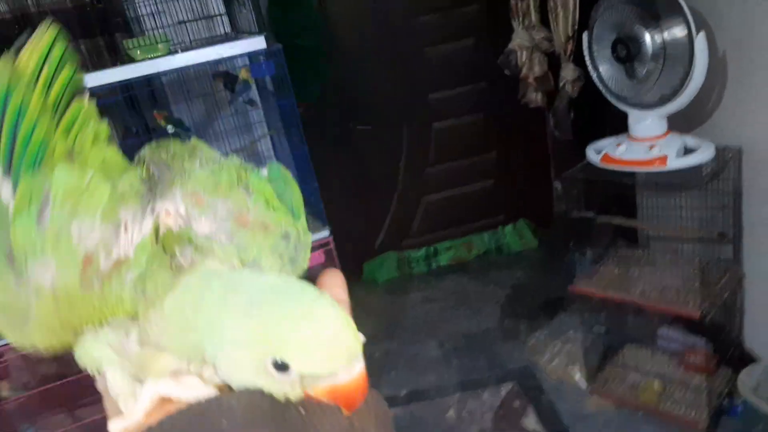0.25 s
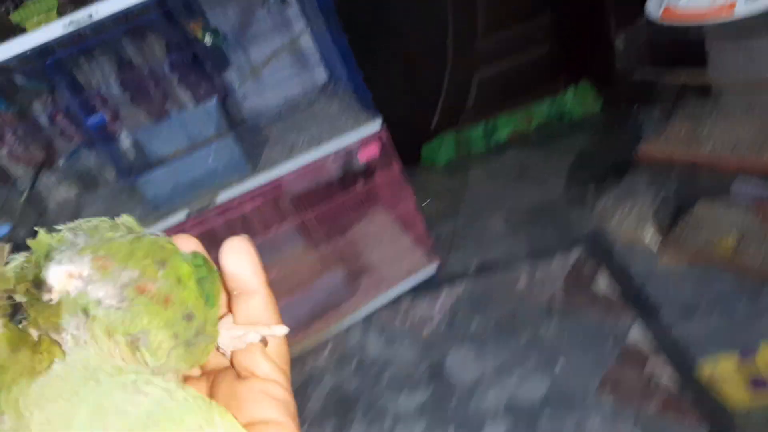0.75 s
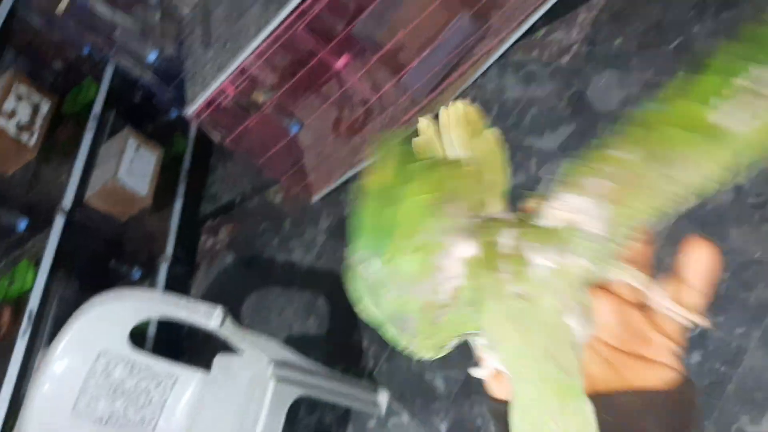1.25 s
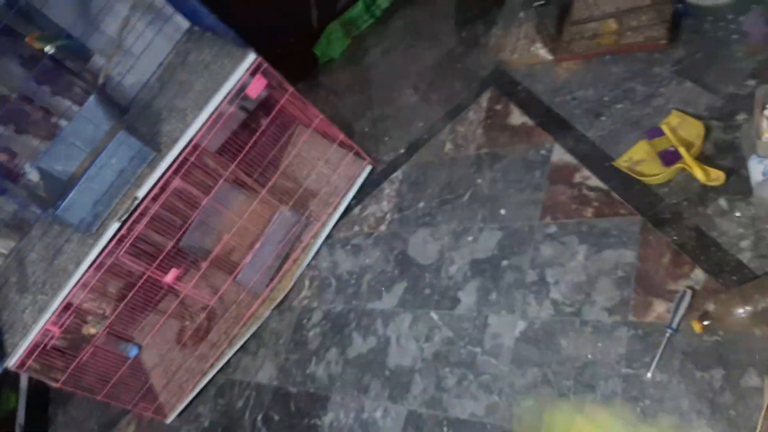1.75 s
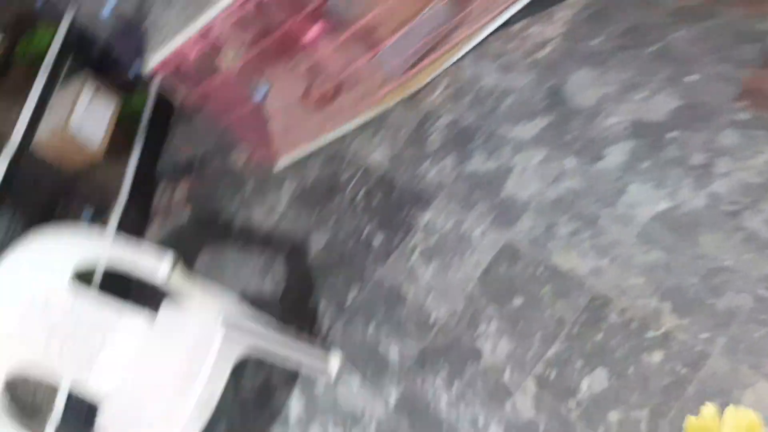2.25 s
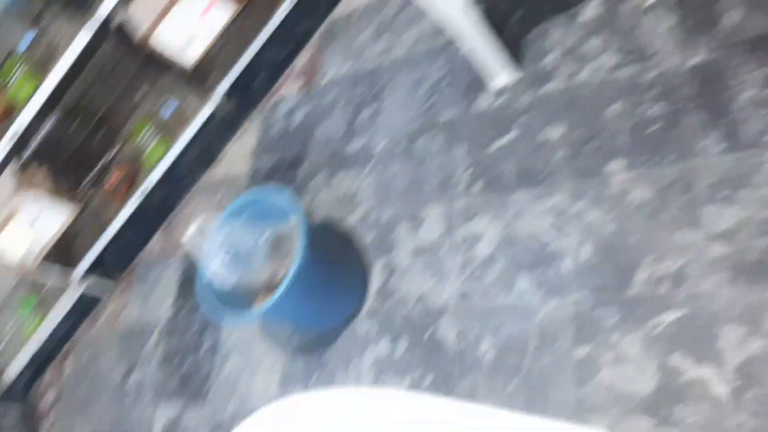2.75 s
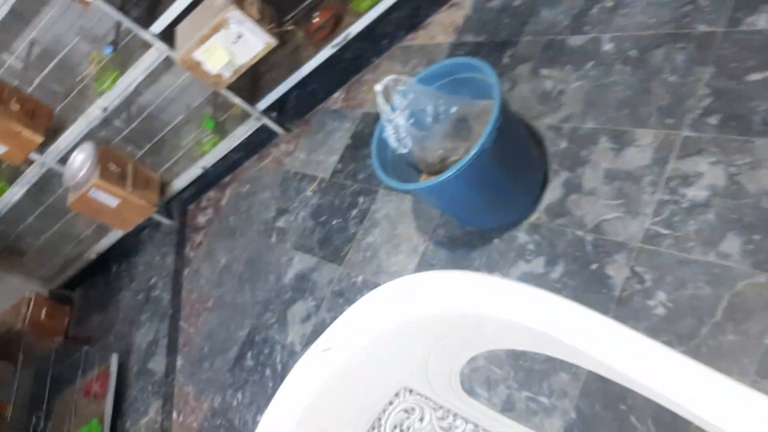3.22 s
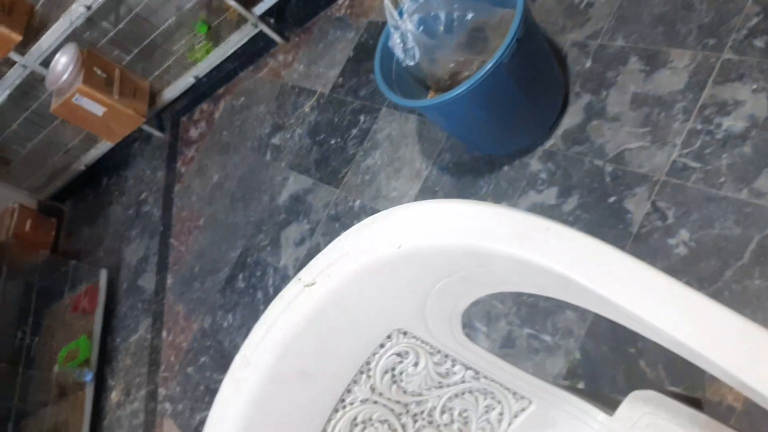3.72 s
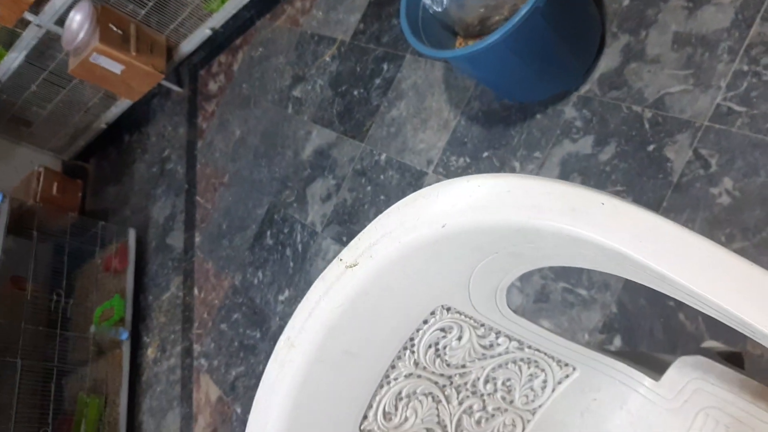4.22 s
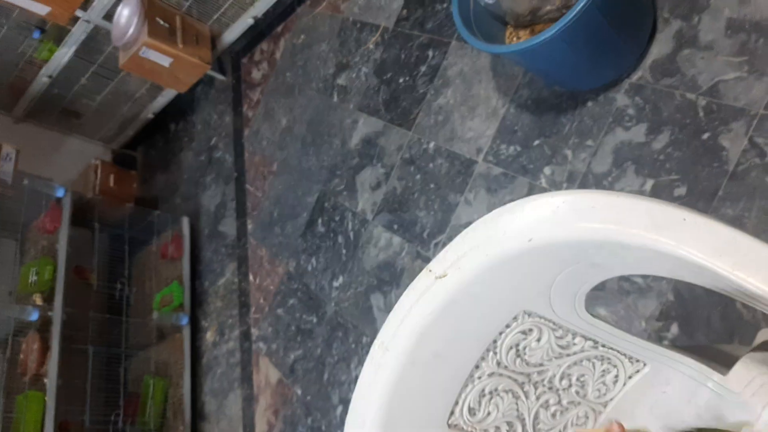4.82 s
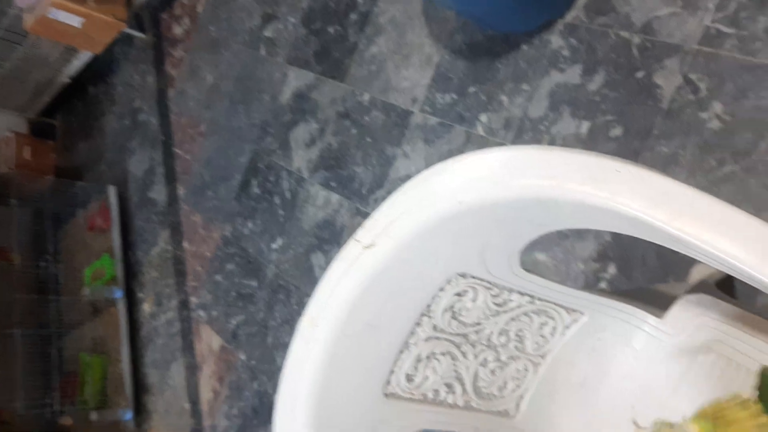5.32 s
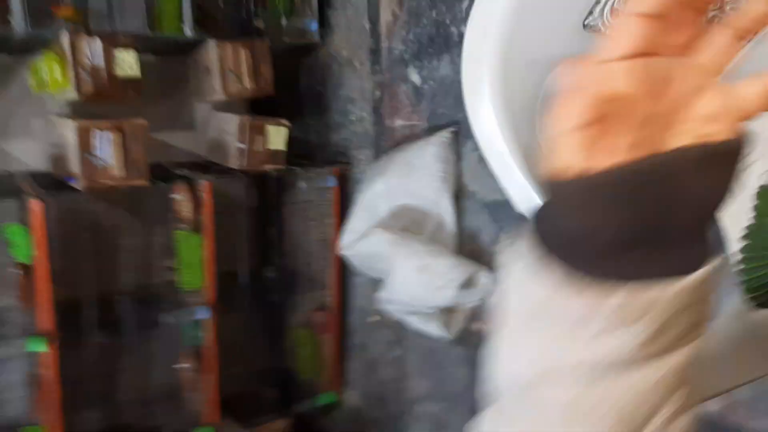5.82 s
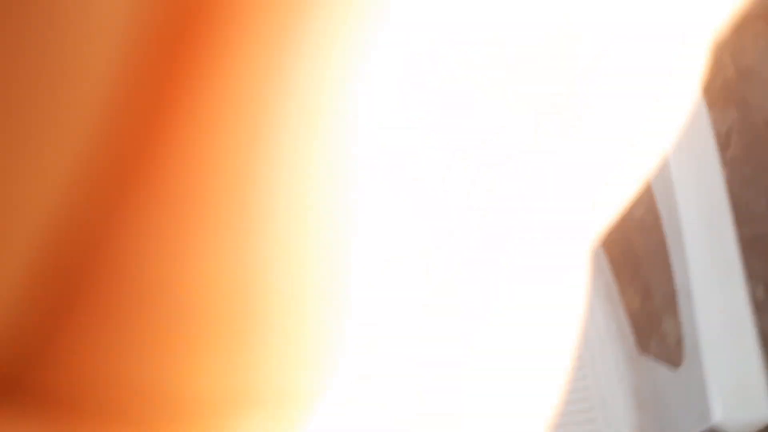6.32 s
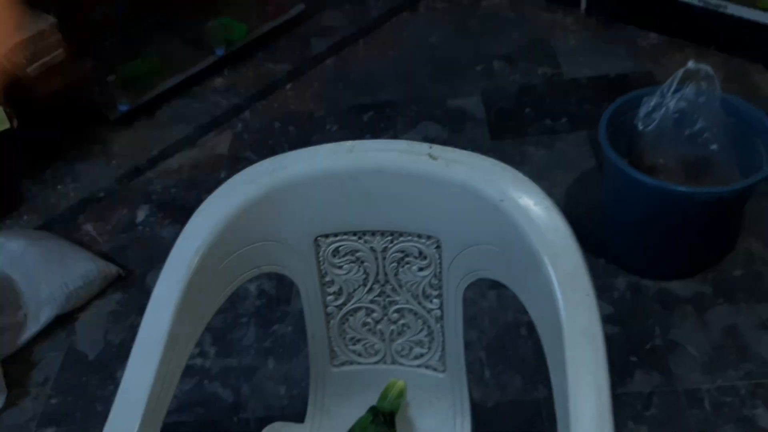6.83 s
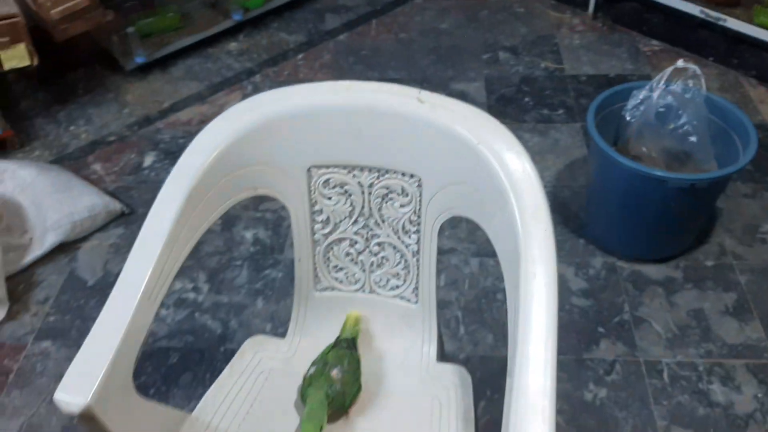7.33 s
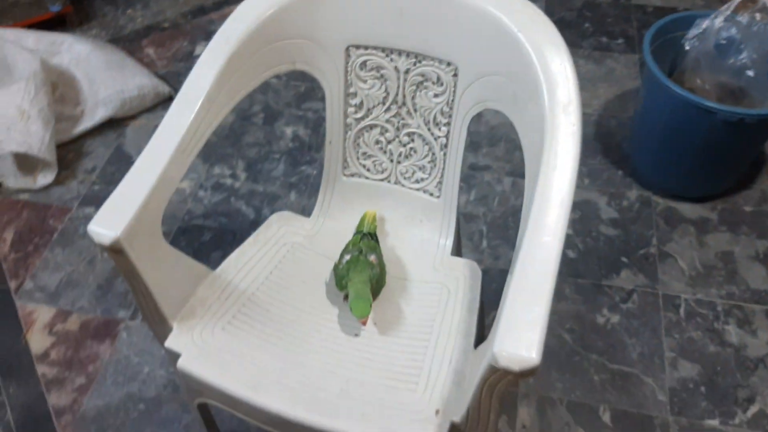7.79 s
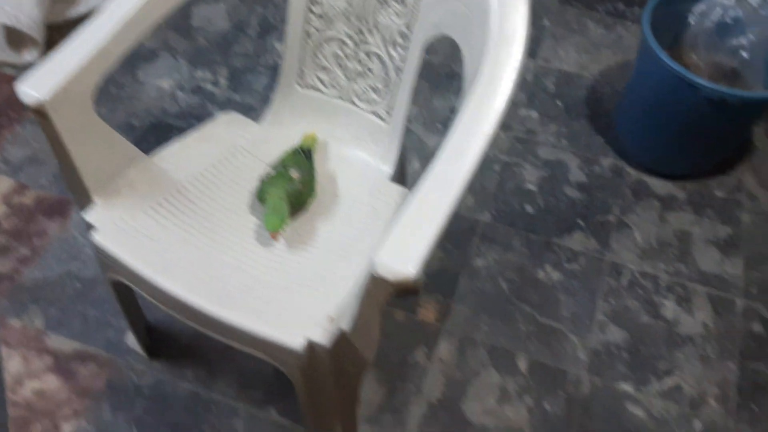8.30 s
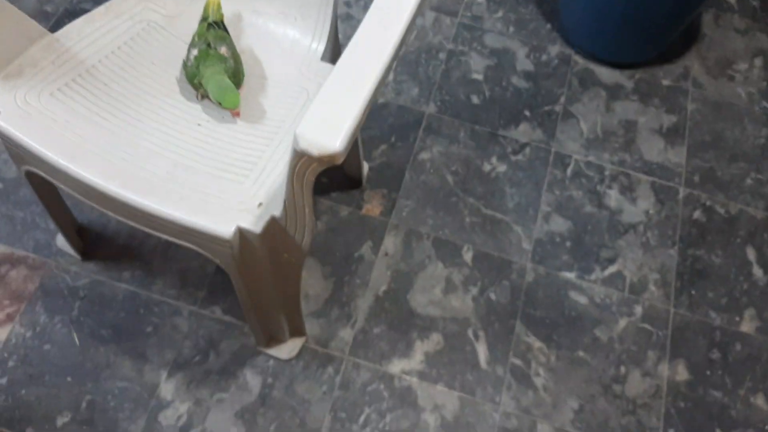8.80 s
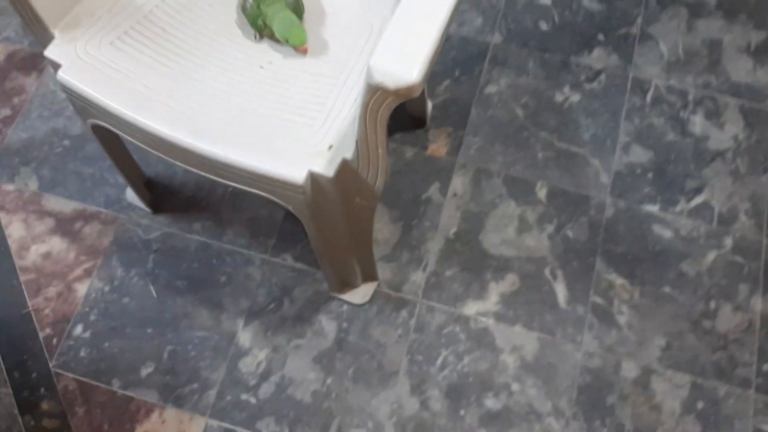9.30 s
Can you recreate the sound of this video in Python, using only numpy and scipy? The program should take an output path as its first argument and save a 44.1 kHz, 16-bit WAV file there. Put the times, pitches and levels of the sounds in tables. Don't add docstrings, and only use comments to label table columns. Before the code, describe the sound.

A chick beside a handheld microphone gives a short squawk and a longer raspy warble. Beak ticks follow, then sharp rising chirps from caged birds. Later, nasal chatter and harsh cries crowd together while feet tap a hollow plastic chair. The calls smear into short bright echoes in a hard-floored shed, over faint hum and moving air, ending with dull finger bumps.

```python
import sys
import numpy as np
from scipy import signal
from scipy.io import wavfile
from scipy.ndimage import uniform_filter1d, minimum_filter1d

SR = 44100
rng = np.random.default_rng(int(sys.argv[2]) if len(sys.argv) > 2 else 0)


def convert_level_to_amplitude(level_db):
    exponent = np.asarray(level_db, float) / 20
    return 10 ** exponent


def dump(signal):
    limited = np.clip(np.atleast_2d(signal).T, -1, 1)
    pcm = np.round(limited * 32767).astype(np.int16)
    wavfile.write(sys.argv[1], SR, pcm)


N = 421155
PORT_GAP = 7
TURN_S = 3.42

# f/Hz, level/dB
CAGED_THROAT = [(1900, -58), (2200, 1.5), (3500, 20.5), (5000, 11), (6500, 0.5), (7500, -11.5), (9000, -17),
                (12500, -19), (15500, -23.5)]


def evened(x):
    return x / np.sqrt(np.mean(x ** 2) + 1e-20)


def read(points, hz):
    f, value = np.transpose(points)[:2]
    return np.interp(np.log(hz + 1), np.log(f + 1), value)


def add(mix, s, sound):
    part = mix[..., round(s * SR):][..., :sound.shape[-1]]
    part += sound[..., :part.shape[-1]]


def unfold(rows):
    s, *columns = np.transpose(rows)
    t = np.arange(s[0], s[-1], 1 / SR)
    return t, [np.interp(t, s, c) for c in columns]


def wobble(count, hz):
    drift = signal.lfilter(*signal.butter(2, hz, fs=SR), rng.standard_normal(count + 400))
    return evened(drift[400:])


def highpass(x, order, hz):
    return signal.sosfilt(signal.butter(order, hz, "high", fs=SR, output="sos"), x)


def coloured(x, points):
    hz = np.linspace(0, SR / 2, 257)
    return signal.oaconvolve(x, signal.firwin2(255, hz, convert_level_to_amplitude(read(points, hz)), fs=SR), "same")


def syrinx(hz, first_db, harsh, throat, jitter, breath_db):
    count = len(hz)
    shaken_hz = hz * (1 + jitter * harsh * wobble(count, hz=461))
    turn = 2 * np.pi * np.cumsum(shaken_hz) / SR
    partials = np.zeros(count)
    for k in range(1, 9):
        level_db = read(throat, k * hz) + first_db * (k == 1)
        partials += convert_level_to_amplitude(level_db) * (k * hz < 16000) * np.cos(k * turn)
    air = evened(coloured(rng.standard_normal(count), throat))
    pulsing = convert_level_to_amplitude(8 * harsh * wobble(count, hz=190).clip(-3, 1.3))
    return evened((evened(partials) + convert_level_to_amplitude(breath_db) * harsh * air) * pulsing)


def chick():
    # t/s, level/dB, lowest pitch f/Hz, warble height f/Hz, extra level on crests/dB
    squawks = [
        [(0, -13.5, 1290, 86, -5.5), (.06, -0.5, 1232, 30, 2), (.09, -10, 1134, 3, 3), (.102, -38, 960, 5, 0)],
        [(.3, -21.5, 1453, 5.4, -8), (.318, -22.5, 1253, 6, -3), (.33, -14, 1613, 340, -2),
         (.38, -8.5, 1562, 540, 7), (.45, -7, 1473, 530, 17.5), (.55, -10.5, 1370, 270, -1),
         (.62, -10.5, 1288, 42, -6.5), (.662, -2, 1157, 10, -2), (.676, -27, 960, 5, 10)],
    ]
    crest_times = [0.0165, .3425]
    # f/Hz, level/dB
    narrow_throat = [(1100, -14), (1500, -0.5), (2000, 6.5), (2500, 9.5), (3000, 10), (4000, 4.5),
                     (5000, -9), (6000, -12), (7000, -22.5), (9000, -27.5), (14000, -28)]
    # f/Hz, level/dB
    open_throat = [(1100, -9), (1500, -4), (2000, 5), (2600, 3), (3900, 7), (4800, -4), (6000, -2),
                   (7300, -20), (14000, -52)]
    warble_hz, rasp_db, crack_db = 28.6, -9, 9
    out = np.zeros(N)
    for rows, crest_s, harsh, throat in zip(squawks, crest_times, (.25, .12), (narrow_throat, open_throat)):
        t, (level_db, low_hz, height_hz, crest_db) = unfold(rows)
        arch = .5 + .55 * np.tanh(.25 + 1.25 * np.cos(2 * np.pi * warble_hz * (t - crest_s)))
        top_db = crest_db * (2 * arch - 1)
        swing = height_hz / 500 * (1 - arch.clip(0, 1) ** 2)
        first_db = crack_db * swing - .31 * top_db
        voice = syrinx(low_hz + height_hz * arch, first_db, harsh + .08 * swing, throat, .07, -41)
        voice *= convert_level_to_amplitude(-crack_db * swing)
        rasp = evened(highpass(coloured(rng.standard_normal(len(t)), narrow_throat), 6, 3300))
        add(out, t[0], convert_level_to_amplitude(level_db) * (convert_level_to_amplitude(top_db) * voice + convert_level_to_amplitude(rasp_db) * rasp))
    return highpass(out, 6, 900)


def perch(mix, s, sound):
    lag_s = rng.integers(5, PORT_GAP + 2) / SR
    add(mix[int(s > TURN_S)], s, sound)
    add(mix[int(s < TURN_S)], s + lag_s, sound)


def chirps(mix):
    # t/s, peak level/dB, second partial at start f/Hz, at end f/Hz, length/s
    jumps = [
        (1.072, -1.5, 4150, 6170, 0.048),
        (5.026, -3.5, 4700, 6000, 0.054),
        (5.331, -0.5, 4710, 5910, 0.048),
        (5.641, -1, 4650, 5850, 0.054),
        (7.886, -4, 4250, 5726, 0.0585),
        (8.528, -5, 4346, 5925, 0.054),
    ]
    quick = [(1.599, -1, 4140, 6240, 0.041), (1.904, 1.5, 4466, 6200, 0.035),
             (2.066, -3, 4390, 6710, 0.032), (2.155, 0.5, 4693, 6890, 0.032), (2.262, 2, 4660, 6570, 0.028),
             (2.363, -2, 4710, 6530, 0.031), (2.459, 0, 4950, 6300, 0.036), (2.68, -4.5, 4100, 6030, 0.053),
             (3.289, -13, 4080, 6170, 0.038), (3.677, -0.5, 4435, 6070, 0.041),
             (3.902, -3.5, 4450, 6275, 0.059), (4.023, -5.5, 4210, 6160, 0.042),
             (4.146, -2.5, 4590, 6330, 0.047), (7.652, -6, 4200, 5000, 0.053),
             (8.736, -8.5, 4216, 6320, 0.04)]
    sweeps = [
        (3.474, -5, 4133, 6070, 0.07),
        (4.695, -5, 4080, 6180, 0.053),
        (9.149, -3.5, 4477, 6370, 0.058),
    ]
    # f/Hz, level/dB
    throat = [(1900, -6.5), (2200, 3.5), (3500, 6.5), (5000, 11.5), (6400, 6), (7500, -18), (9000, -22.5),
              (11000, -15.5), (13000, -19), (15500, -28.5)]
    hold_s, hold_db, swell_db = .011, -5, 5
    for table, climb in ((jumps, .14), (quick, .42), (sweeps, .7)):
        for s, db, start_hz, end_hz, length in table:
            t = np.arange(0, length, 1 / SR)
            rise = np.clip((t - hold_s) / (climb * length), 0, 1) ** .5
            hz = (start_hz + (end_hz - start_hz) * rise) / 2
            first_db = -34 - 1.5 * db
            growth_db = -swell_db * np.clip(1 - t / (1.24 * length), 0, 1)
            soft_db = hold_db * np.clip((hold_s - t) / .00085, 0, 1)
            fade = np.minimum(t / .0029, 1) * np.minimum((length - t) / .01, 1)
            harsh = .5 + rng.uniform(.05, .3) * rise
            voice = syrinx(hz, first_db * rise - 1, harsh, throat, .055, -5)
            perch(mix, s, convert_level_to_amplitude(db - 11 + growth_db + soft_db) * fade * voice)


def gliding_call(mix, s, db, start_hz, length, glide, first_db, harsh, breath_db):
    t = np.arange(0, length, 1 / SR)
    growth_db = -3 * np.clip(1 - t / (.32 * length), 0, 1)
    opening = np.minimum(t / min(.007, length / 3), 1)
    shape = convert_level_to_amplitude(1.5 + growth_db) * opening * (1 - t / length) ** .47
    hz = start_hz * (1 + glide * t / length)
    perch(mix, s, convert_level_to_amplitude(db) * shape * syrinx(hz, first_db, harsh, CAGED_THROAT, .0883, breath_db))


def chatter(mix):
    # t/s, peak level/dB, starting pitch f/Hz, length/s
    level_notes = [(2.775, -22.5, 2250, 0.015), (2.82, -28, 3570, 0.011), (2.924, -21, 3017, 0.022),
                   (3.0, -29.5, 3097, 0.034), (3.002, -33, 3770, 0.031), (3.085, -26, 2616, 0.02),
                   (3.17, -20.5, 2640, 0.02), (4.238, -15, 2590, 0.026), (4.264, -1.5, 2435, 0.022),
                   (4.296, -11.5, 2470, 0.0306), (4.36, -2, 2480, 0.0067), (4.27, -19.5, 3160, 0.054),
                   (5.615, -16, 2484, 0.046), (5.997, -11.5, 2805, 0.015), (6.03, -22, 2352, 0.087),
                   (6.53, -23.5, 2885, 0.06), (6.294, -8.5, 2410, .02), (6.306, -11, 2653, 0.016),
                   (6.268, -15.5, 2190, 0.035), (6.415, -28, 2280, 0.0059), (6.785, -18, 2317, 0.036),
                   (6.835, -15.5, 2357, 0.048), (6.895, -14.5, 2372, .09), (7.105, -26.5, 3120, 0.036),
                   (7.24, -15, 2396, 0.079), (7.242, -30, 3170, 0.163), (7.365, -16, 2346, 0.0547),
                   (8.115, -21.5, 2497, 0.031), (8.195, -21, 2542, 0.03), (8.405, -22.5, 2545, 0.038)]
    # t/s, peak level/dB, starting pitch f/Hz, length/s
    falls = [
        (4.375, -16, 2413, 0.074),
        (4.45, -38.5, 2273, 0.038),
        (5.74, -14.5, 2210, 0.067),
        (8.052, -18.5, 2835, 0.034),
        (8.335, -19.5, 2727, 0.026),
        (9.355, -23, 2627, 0.011),
    ]
    # f/Hz, level/dB
    first_partial = [(2300, 4.5), (2550, -9), (3600, -16.5)]
    for table, glide, harsh, breath_db in ((level_notes, .0276, .38, -10), (falls, -.14, .42, -9)):
        for s, db, start_hz, length in table:
            first_db = read(first_partial, start_hz) - .94 * max(db + 21, 0)
            gliding_call(mix, s, db, start_hz, length, glide, first_db, harsh, breath_db)


def cries(mix):
    # t/s, peak level/dB, starting pitch f/Hz, length/s
    calls = [(0, -22.5, 2330, 0.15), (2.572, -18, 2157, 0.016), (2.637, -22, 2520, 0.0115),
             (2.851, -14, 2423, 0.0131), (5.7, -18.5, 2463, 0.097), (6.085, -19, 2381, 0.16),
             (6.213, -12, 2472, 0.0334), (5.958, -17.5, 2162, 0.079), (5.69, -23, 2900, .12),
             (6.46, -17.5, 2303, 0.18), (6.6, -11.5, 2512, 0.0395), (6.81, -15, 2690, 0.0225),
             (6.89, -29, 3010, 0.19), (6.91, -13.5, 2637, 0.0236), (7.0, -19, 2475, 0.059),
             (7.105, -16.5, 2448, .065), (7.405, -12.5, 2480, 0.0142), (7.541, -18, 2200, 0.028),
             (7.607, -28.5, 2576, 0.082), (7.657, -18, 2464, 0.0354), (7.755, -21, 2600, 0.0343),
             (7.825, -23, 2890, 0.0318), (7.9, -22, 2610, 0.0223), (7.95, -21.5, 2707, 0.047),
             (9.42, -29, 2820, 0.023), (9.475, -26.5, 2510, 0.03)]
    # length/s, level/dB
    first_partial = [(.02, -17.5), (.07, -6.5)]
    for s, db, start_hz, length in calls:
        first_db = np.interp(length, *np.transpose(first_partial))
        gliding_call(mix, s, db, start_hz, length, .12, first_db, .65, -9)


def ticks(mix):
    # t/s, peak level/dB, centre f/Hz
    snaps = [(0.175, -11.5, 5590), (0.2174, -20.5, 4320), (0.2619, -17.5, 3970), (0.297, -20, 4500),
             (0.709, -21.5, 3760), (0.8435, -20.5, 4270), (0.9148, -22, 4400), (0.9887, -19, 4450),
             (1.062, -28, 4100), (1.227, -21.5, 3910), (1.31, -14.5, 5480), (1.392, -23, 4160),
             (1.468, -18, 4200), (1.543, -19.5, 4340), (1.703, -16.5, 5850), (5.2565, -43, 5860),
             (5.5633, -43, 5810), (9.0894, -59, 3950)]
    for s, db, hz in snaps:
        t = np.arange(0, .015, 1 / SR)
        tone = np.cos(2 * np.pi * np.cumsum(hz * (1.12 - 25 * t)) / SR)
        snap = tone + .5 * rng.standard_normal(len(t))
        perch(mix, s, convert_level_to_amplitude(db - 5) * coloured(snap * np.exp(-t / .0017), CAGED_THROAT))


def flock():
    out = np.zeros((2, N))
    chirps(out)
    chatter(out)
    cries(out)
    ticks(out)
    return highpass(out, 8, 2030)


def whistles():
    # t/s, level/dB, pitch f/Hz
    far_notes = [
        [(1.28, -50, 2800), (1.33, -43, 2100), (1.37, -50, 1800), (1.44, -54, 1620), (1.52, -47, 1546),
         (1.58, -57, 1500)],
        [(3.56, -34, 1435), (3.61, -46, 1476), (3.68, -57, 1510), (3.78, -49, 1570)],
        [(9.26, -46, 1720), (9.35, -50, 1740), (9.45, -39, 1660)],
    ]
    out = np.zeros(N)
    for rows in far_notes:
        t, (level_db, hz) = unfold(rows)
        turn = 2 * np.pi * np.cumsum(hz * (1 + .03 * wobble(len(t), hz=60))) / SR
        level = convert_level_to_amplitude(level_db + 5 * wobble(len(t), hz=30))
        add(out, t[0], level * np.sin(turn) * signal.windows.tukey(len(t), .3))
    return out


def chair():
    # t/s, peak level/dB, brightness/dB per octave
    taps = [(4.268, -16, -5), (4.596, -37.5, -7.5), (4.635, -39.5, 19.5), (5.161, -37, 13.5),
            (5.437, -19, 5), (5.508, -17, 6.5), (5.727, -31, 4), (5.781, -42, 16), (5.848, -39, 11),
            (6.223, -58, 28), (6.429, -63, -10), (6.61, -51, 17), (6.799, -60, 1), (7.135, -32.5, -4),
            (7.404, -35, 3), (7.743, -30, 3), (7.931, -33.5, 5), (8.158, -33, 7), (8.712, -45, -4),
            (8.882, -46.5, 24)]
    # f/Hz, level/dB, time to fade by 60 dB/s
    modes = [(250, -18, .06), (311, 0, .2), (324, -13, .1), (390, -18, .06), (550, -7, .045),
             (690, -20, .045), (900, -32, .05)]
    out, t = np.zeros(N), np.arange(7000) / SR
    for s, db, bright_db in taps:
        ring = np.zeros(len(t))
        for hz, mode_db, t60 in modes:
            level = convert_level_to_amplitude(mode_db + bright_db * np.log2(hz / 300) - 60 * t / t60)
            ring += level * np.sin(2 * np.pi * hz * rng.uniform(.99, 1.01) * t)
        thud = convert_level_to_amplitude(-12 - 60 * t / .08) * wobble(len(t), hz=574)
        add(out, s, convert_level_to_amplitude(db - 8) * np.minimum(t / .00062, 1) * (ring + thud))
    return highpass(out, 2, 150)


def fingers():
    # t/s, peak level/dB, left over right/dB, length/s
    bumps = [(6.227, -40, 23, 0.0011), (6.43, -42.5, 15, 0.0046), (6.796, -47, 22, 0.016),
             (7.379, -39.5, -1, 0.002), (9.092, -32.5, 21, 0.011), (9.121, -40, 19, 0.0054),
             (9.135, -36, 19, 0.0083), (9.176, -35, 15, 0.013), (9.24, -35.5, 7, 0.0051),
             (9.475, -36.5, 22, 0.0058), (9.499, -31, 23, 0.0073), (9.515, -26, 16, 0.004),
             (9.531, -34.5, 20, 0.0056)]
    puffs = [
        (1.099, -49, 6, 0.015),
        (1.617, -39.5, 6.7, 0.019),
        (1.923, -42, 9.4, 0.025),
        (3.699, -41.5, 4, 0.053),
        (6.821, -51.5, 22, 0.025),
    ]
    out, t = np.zeros((2, N)), np.arange(8000) / SR
    for s, db, pan_db, length in bumps + puffs:
        fade = np.exp(-t / length) * np.minimum(4 * t / length, 1)
        knock = wobble(len(t), hz=200 + 2.1 / length) * fade
        add(out, s, convert_level_to_amplitude(db + np.array([[pan_db / 2], [-pan_db / 2]])) * knock)
    return out


def lumpy_noise(colour, same):
    frames, hz = N // 256 + 5, np.fft.rfftfreq(1024, 1 / SR)
    a, b, c, d, lumps = rng.standard_normal((frames, 513, 5), dtype=np.float32).T
    lumps = evened(uniform_filter1d(uniform_filter1d(lumps, 12, 0), 8, 1))
    left = a + 1j * b
    z = np.array([left, same * left + np.sqrt(1 - same ** 2) * (c + 1j * d)])
    z *= convert_level_to_amplitude(read(colour, hz)[:, None] + 3.5 * lumps)
    return evened(signal.istft(z, nperseg=1024, noverlap=768)[1][:, :N])


def bed():
    # t/s, level/dB
    stir = [(0.0, -82.5), (1.91, -83.5), (2.28, -66.5), (2.42, -66.5), (3.06, -72), (3.38, -85),
            (4.23, -88), (4.49, -70.5), (4.92, -74.5), (5.45, -75), (5.61, -65.5), (5.98, -77), (7.18, -85),
            (8.03, -72.5), (8.46, -74.5), (8.7, -69), (8.83, -68), (9.55, -58.5)]
    # f/Hz, level/dB per Hz
    air_colour = [(15, -41), (25, -9), (59, -22), (92, -6.5), (124, -8), (204, -20), (400, -12.5),
                  (520, -26), (880, -120)]
    # f/Hz, level/dB per Hz
    hum_colour = [(88, -49), (150, -27), (398, -9.5), (1660, -18), (2360, -13), (3420, -14), (5050, -14),
                  (6260, -25.5), (7770, -28), (12400, -35.5), (16000, -55)]
    s, points_db = np.transpose(stir)
    stir_db = np.interp(np.arange(N) / SR, s, points_db)
    air = lumpy_noise(air_colour, same=.3) * convert_level_to_amplitude(stir_db + 19)
    hum = lumpy_noise(hum_colour, same=.7) * convert_level_to_amplitude(-52 + .37 * (stir_db + 67.5))
    return (air + hum) * convert_level_to_amplitude(np.array([[1.5], [-1.5]]))


def shed(x):
    # f/Hz, time to fade by 60 dB/s
    fading = [(300, 0.63), (1500, 0.33), (4000, 0.35), (7000, 0.35), (12000, 0.26)]
    slots = np.arange(150, SR // 2, 20)
    at = slots + rng.integers(0, 20, len(slots))
    sign = rng.choice([-1., 1.], len(slots))
    lead = np.round(PORT_GAP * np.cos(np.pi * rng.random(len(slots)))).astype(int)
    echoes = np.zeros((2, SR // 2 + 40))
    echoes[0, at] = sign
    np.add.at(echoes[1], at + lead, sign)
    hz, t, z = signal.stft(echoes, SR, nperseg=256)
    tail = signal.istft(z * convert_level_to_amplitude(-60 * t / read(fading, hz)[:, None]), SR, nperseg=256)[1]
    return signal.oaconvolve(x[None], tail / np.linalg.norm(tail[0]), axes=1)[:, :N]


def ports(x):
    late, turned = np.roll(x, PORT_GAP - 1), np.arange(N) > TURN_S * SR
    return np.array([np.where(turned, late, x), np.where(turned, x, late)])


def scene():
    near, caged, far, seat = chick(), flock(), convert_level_to_amplitude(-4) * whistles(), chair()
    direct = ports(near) * convert_level_to_amplitude(np.array([[-.6], [.6]]))
    direct += caged * convert_level_to_amplitude(np.array([[-2], [-3.2]])) + convert_level_to_amplitude(.5) * seat
    echoing = convert_level_to_amplitude(-15) * near + convert_level_to_amplitude(-1.5) * caged[0] + far + convert_level_to_amplitude(-6) * seat
    return direct + shed(echoing) + fingers() + bed()


def masked(x):
    hz, t, z = signal.stft(x, SR, nperseg=1024)
    power = uniform_filter1d((abs(z) ** 2).mean(0), size=12, axis=0)
    band_db = 10 * np.log10(power + 1e-16)
    keep = .5 + .5 * np.tanh((band_db - band_db.max(0) + 36) / 3)
    return signal.istft(z * np.where(hz[:, None] > 6800, keep, 1), SR, nperseg=1024)[1][:, :N]


def top_cut(x):
    return signal.sosfilt(signal.butter(12, 16680, fs=SR, output="sos"), x)


def record(dry):
    # f/Hz, level/dB
    overall_colour = [(30, -17), (120, -8.5), (300, -2), (6800, 2), (7600, -5.5), (8400, -1.5), (9300, 2),
                      (12000, 8.5), (16000, 3)]
    hz = np.linspace(0, SR / 2, 1025)
    response = signal.firwin2(1501, hz, convert_level_to_amplitude(read(overall_colour, hz)), fs=SR)
    heard = signal.oaconvolve(dry, response[None], "same", axes=1)
    heard = heard + convert_level_to_amplitude(-67) * np.diff(rng.standard_normal((2, N + 1)))
    heard = masked(heard)
    room_left = 1 / np.maximum(np.abs(heard).max(0), 1)
    limiter = uniform_filter1d(minimum_filter1d(room_left, size=201), size=101)
    return top_cut(heard * limiter)


dry = scene()
out = record(dry)
dump(out)
```